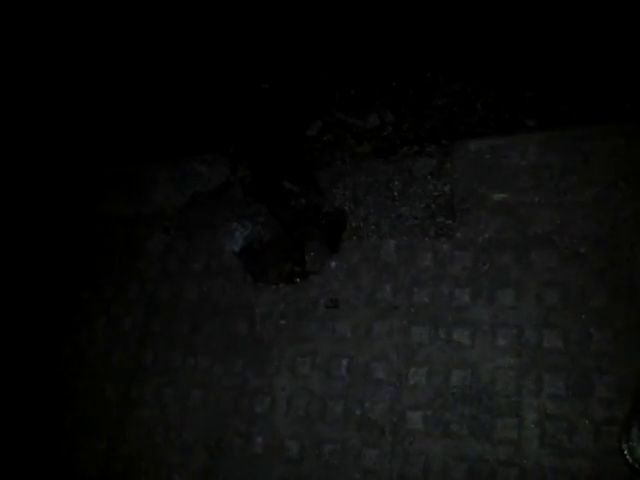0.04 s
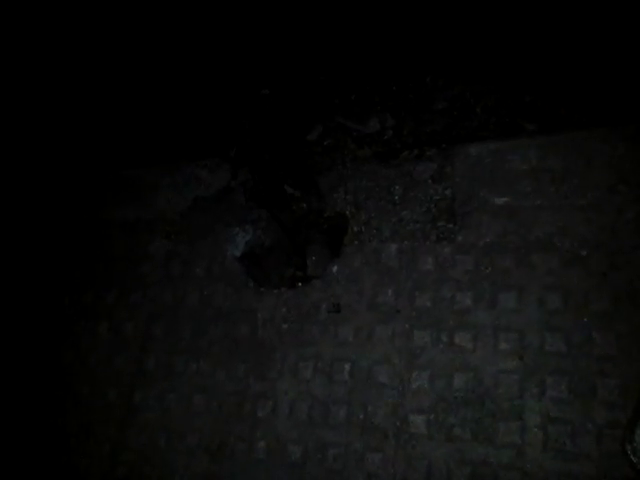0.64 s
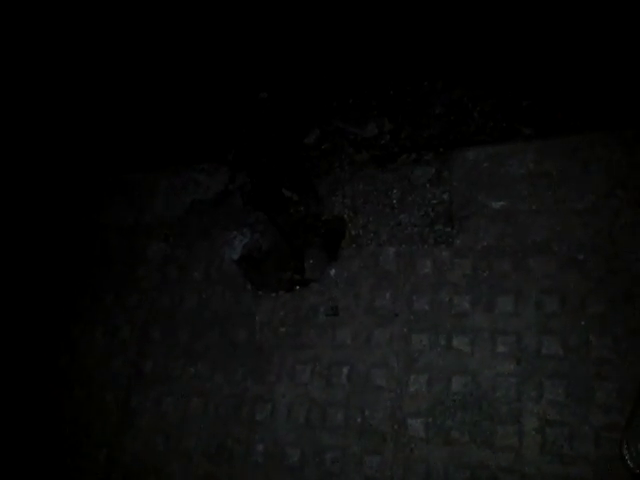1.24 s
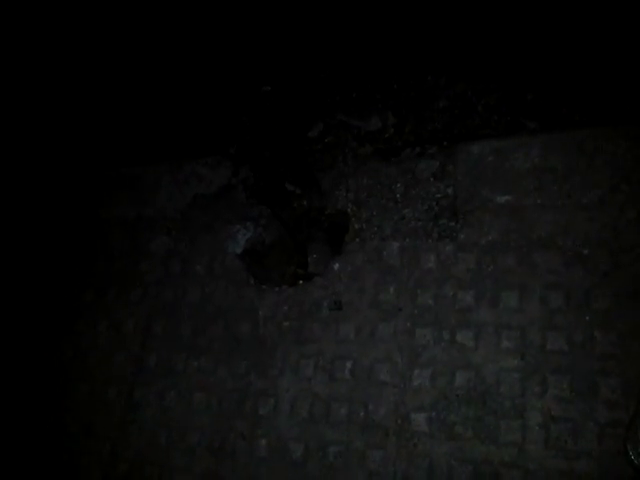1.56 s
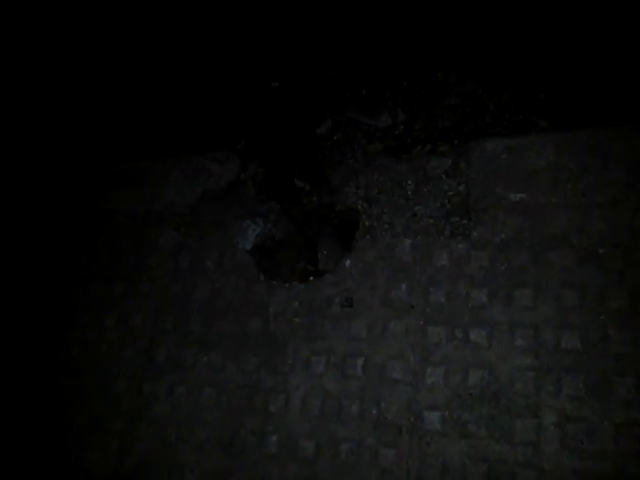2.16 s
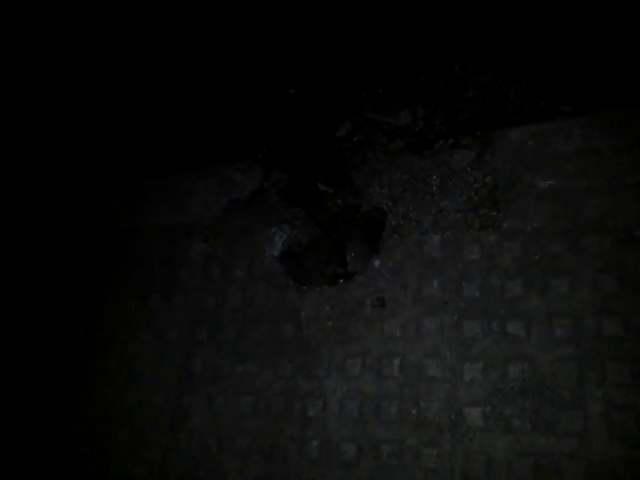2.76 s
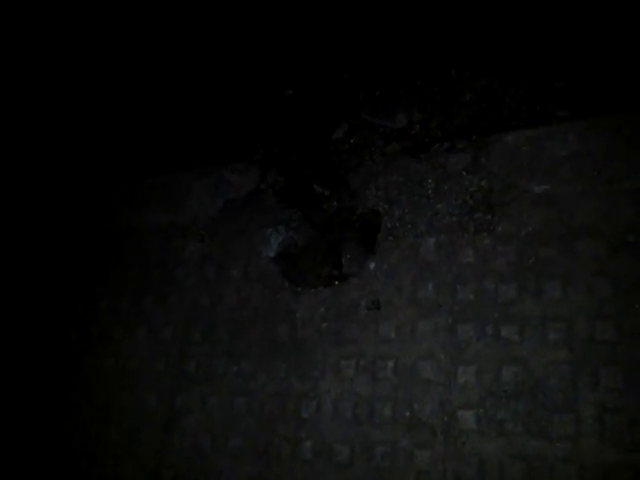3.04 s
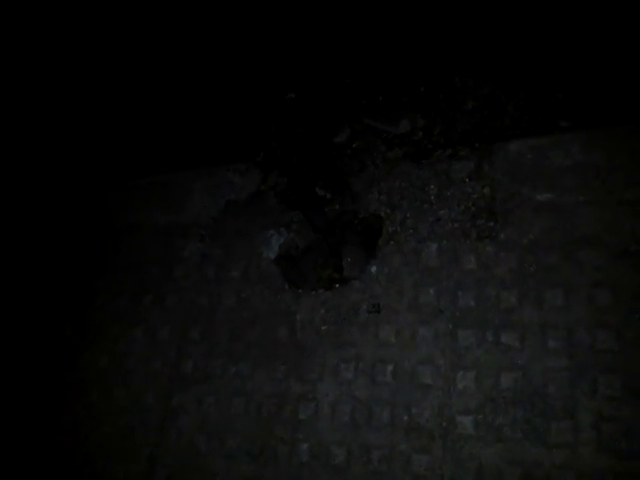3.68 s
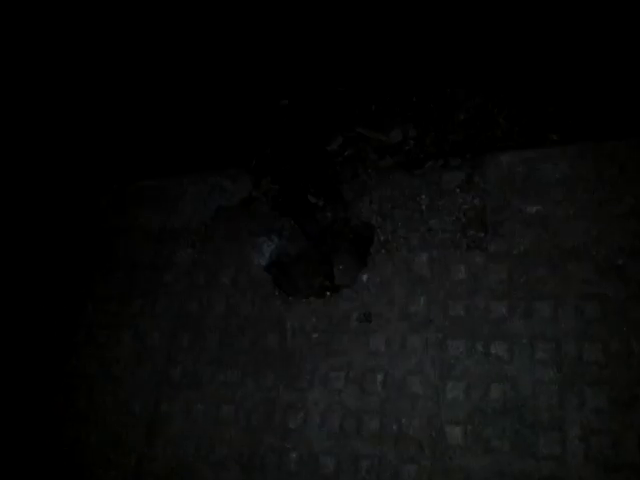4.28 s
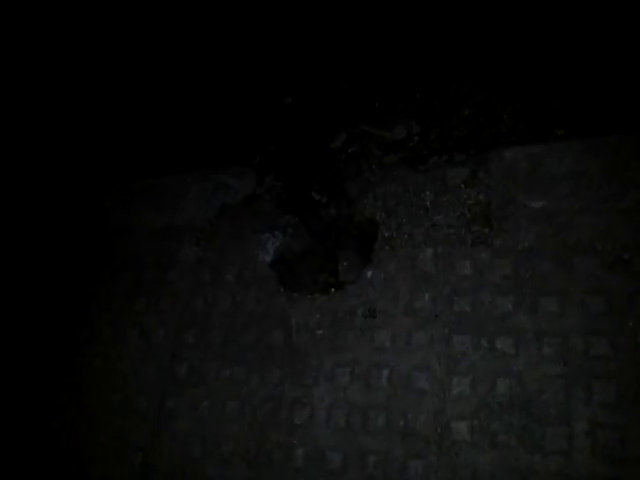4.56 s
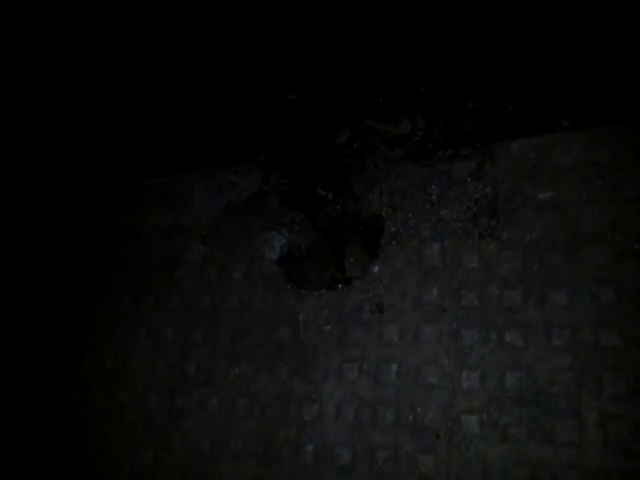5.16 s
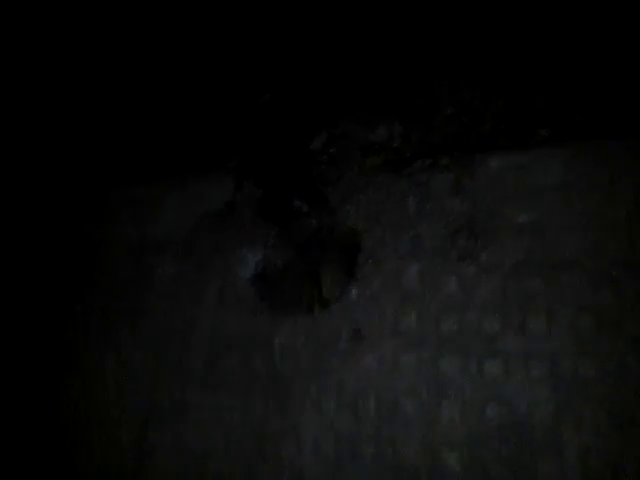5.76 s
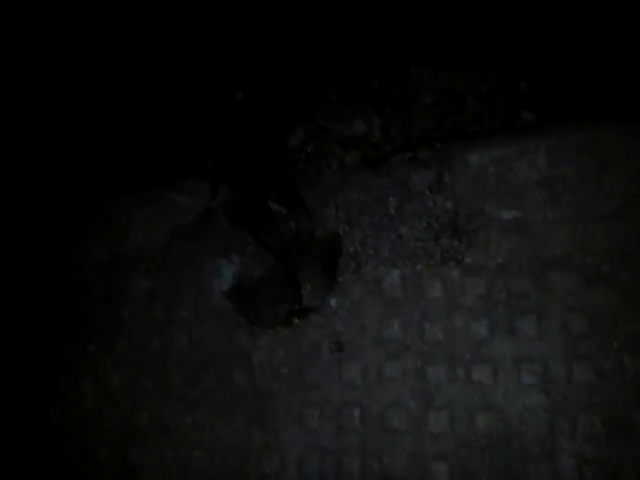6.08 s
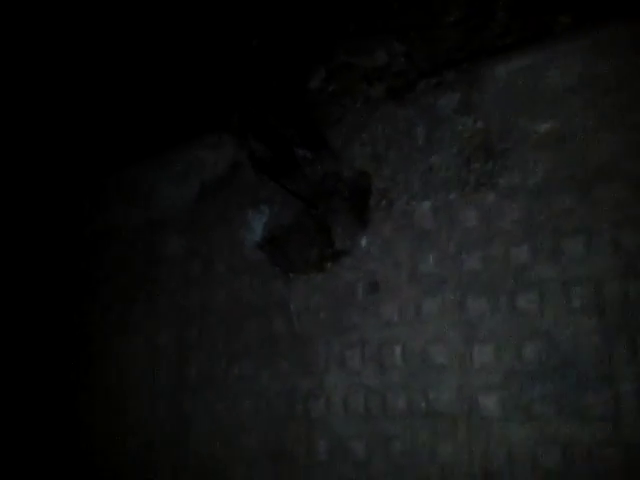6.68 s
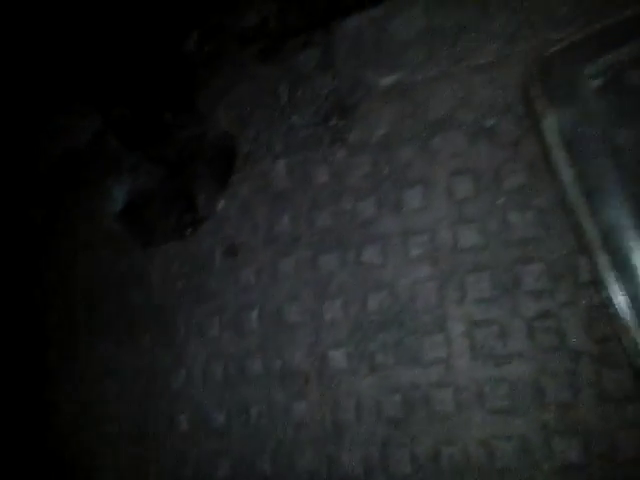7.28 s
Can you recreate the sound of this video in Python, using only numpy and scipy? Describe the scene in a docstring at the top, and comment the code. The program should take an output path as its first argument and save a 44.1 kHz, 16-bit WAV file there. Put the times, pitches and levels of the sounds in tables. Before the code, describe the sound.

Irregular hollow knocks and clacks of a metal tray on stone as a dog eats, with small wet smacks and faint night insects.

```python
"""Paved yard at night: a dog eats from a metal tray. Tongue and teeth tap, lick and scrape the tray; saliva
parts in small smacks. Each knock is a thud and a clack that ring the tray's modes, with brief wall echoes. Once
the tray tips, rocks on the stone and hums. Behind it: a soft dry rustle, a cricket's chirp phrases with a
second cricket's lone chirps, a distant insect's trill and a low wash of night air."""
import sys
import numpy as np
from scipy import signal
from scipy.fft import rfft, irfft
from scipy.io import wavfile
from scipy.ndimage import uniform_filter1d

SR = 44100
rng = np.random.default_rng(int(sys.argv[2]) if len(sys.argv) > 2 else 0)


def wrap_up_sound(samples):
    """Save the sound to the file named by the first command line argument, as 16-bit audio."""
    columns = np.atleast_2d(samples).T
    # keep every value between -1 and 1, then stretch to whole-number steps
    tamed = np.clip(columns, -1, 1)
    steps = np.round(tamed * 32767).astype(np.int16)
    wavfile.write(sys.argv[1], SR, steps)


N = 331632
TIME_S = np.arange(N) / SR

# night air: f/Hz, level/dB
AIR_SPECTRUM = [(25, -38), (50, -8), (70, -21), (95, 0), (130, -10), (200, -4), (265, 1.5), (330, -5.5),
                (520, -5.5), (700, -12.5), (850, -11.5), (1800, -20.5), (4000, -32), (7500, -31),
                (10000, -47), (15500, -41.5)]
# bouts of the distant insect: start/s, end/s, level/dB
TRILL_BOUTS = [(0, .11, -64), (0.296, 0.575, -62), (.7, .82, -65), (1, 1.323, -62), (1.41, 1.55, -69),
               (1.727, 2.018, -63.5), (2.1, 2.2, -64.5), (2.323, 2.63, -62.5), (2.853, 3.17, -63),
               (3.303, 3.416, -71), (3.575, 3.785, -66), (3.984, 4.443, -64), (4.58, 4.822, -64.5),
               (5.04, 5.16, -64), (5.27, 5.553, -65), (6.08, 6.318, -63), (6.622, 6.85, -63),
               (6.946, 7.08, -67), (7.22, 7.456, -63.5)]
# cricket phrases: first chirp t/s, level/dB
CHIRP_PHRASES = [(-.142, -51), (.893, -51), (1.894, -51), (2.799, -53.5), (3.836, -57), (5.03, -56),
                 (6.07, -53.5), (6.885, -54)]
# lone chirps of a second cricket: t/s, level/dB
SINGLE_CHIRPS = [(.295, -59), (.52, -65), (.705, -56.5), (1.34, -61), (1.545, -66), (1.74, -58),
                 (2.32, -63), (3.22, -59), (3.47, -67), (3.69, -63), (4.55, -60.5), (5.925, -58.5)]
# rustle swells: peak t/s, level/dB, rise/s, fall/s
RUSTLE_SWELLS = [(.6, -56.5, .15, 0.23), (1.1, -55, 1, 1), (2.88, -47, 0.29, 0.59),
                 (4.29, -45, 0.048, 0.13), (5.68, -45, 0.21, 0.18), (6.25, -49, 0.14, 0.078),
                 (7.25, -53.5, 0.99, 1)]
# dry rub: f/Hz, level/dB
RUSTLE_SPECTRUM = [(300, 2), (1000, 5.5), (2200, 0.5), (4000, -5.5), (5800, -2), (7400, 3.5), (8400, -3),
                   (9800, -12.5), (13000, -17.5), (15500, -17)]
# gritty scuffs: t/s, length/s, level/dB, tilt/(dB/oct)
GRIT_SCUFFS = [(.408, 0.091, -54.5, 2.5), (0.698, 0.039, -53, 6), (2.75, .22, -51, 0.5),
               (2.947, .011, -45, 8), (2.977, 0.018, -48.5, 7), (3.146, 0.015, -47, 9),
               (3.248, 0.013, -48.5, 8), (4.223, .012, -36.5, -2), (4.231, .035, -42.5, -1.5),
               (4.318, 0.017, -43, -2), (5.215, 0.088, -49, -2.5), (5.668, 0.0079, -29.5, 3),
               (6.05, 0.09, -47, -2.5), (6.095, 0.0039, -44, 4), (6.187, .003, -49, 12),
               (6.528, 0.0034, -39, 0), (6.547, 0.0021, -24, 8), (6.572, 0.0025, -34, -3),
               (6.697, 0.061, -55, 6), (7.082, 0.14, -53.5, 6)]
# scrape hiss: f/Hz, level/dB
SCRAPE_SPECTRUM = [(1180, -43), (2000, -11), (2330, -27), (2720, -8), (3610, -13), (4440, -19), (5400, -7),
                   (6580, -4.5), (7110, -0.5), (12300, -16.5), (14600, -15), (15500, -23)]
# lip and tongue clicks: t/s, level/dB, f/Hz
WET_SMACKS = [(0.327, -35, 746), (.339, -38, 4400), (0.446, -45, 9000), (0.485, -45, 7560),
              (.504, -50, 3520), (.539, -43, 5800), (.594, -40, 6200), (0.722, -35, 6200),
              (.753, -46, 1790), (.776, -46, 7450), (1.091, -46, 7450), (1.185, -43, 5960),
              (1.264, -42.5, 5300), (1.281, -45, 6500), (1.411, -40.5, 1690), (2.613, -30.5, 1500),
              (4.27, -29, 1650), (5.504, -48, 10000), (5.603, -35, 2200), (6.47, -24.5, 1530),
              (6.812, -43, 2450)]
# tongue strokes: t/s, length/s, level/dB, f/Hz
TONGUE_STROKES = [(0.283, 0.068, -47.5, 583), (0.408, 0.13, -40.5, 516), (0.602, 0.037, -50.5, 477),
                  (0.694, 0.054, -44.5, 510), (1.027, 0.09, -42.5, 490), (1.316, 0.057, -40, 425),
                  (1.475, 0.074, -38, 383), (1.85, 0.12, -45, 224), (2.417, 0.16, -45, 333),
                  (4.11, 0.086, -42, 460), (4.214, 0.056, -43, 1630), (4.266, 0.091, -37, 496),
                  (4.387, 0.14, -40.5, 260), (5.24, 0.036, -40.5, 298), (6.23, 0.047, -51, 350),
                  (6.459, 0.0138, -48, 700), (6.731, .018, -40, 600), (6.837, 0.052, -46, 165)]
# tray modes: f/Hz, T60/s, level flat/dB, level tipped/dB
TRAY_MODES = [(224, 0.13, 6.5, -19), (275, 0.2, -11, -0.5), (309, .051, 5, -3.5), (345, 0.084, 1, -2.5),
              (422.8, 0.14, -4, -24), (564, .083, -4.5, -9.5), (656, .061, -7, -5.5),
              (842, 0.059, -5.5, -7), (992, 0.08, 6, -27), (1067, .1, -12, -6), (1256, 0.061, 4.5, -35),
              (1721, 0.08, 1, -12), (1980, .078, 1, -20.5), (2186, 0.047, -8, -12.5), (2366, 0.064, 4, -13),
              (2610, 0.029, -8, -16), (2904, .05, 0, -22), (3244, .06, 8, -25), (3640, .06, -7, -29),
              (3780, 0.054, -6, -33)]
# metal on stone: f/Hz, level/dB
CLACK_SPECTRUM = [(40, -23.5), (160, 2), (250, 12), (600, 9), (1000, 7), (2000, 4), (3300, -3.5),
                  (5000, -7.5), (7500, -8), (10000, -20), (15000, -35)]
# landings of the rocking tray: t/s, level/dB, bottom swing re landing/dB, favoured f/Hz
ROCK_LANDINGS = [(3.0103, -15.5, 3.5, 320), (3.0625, -16, -4, 300), (3.1016, -21, -1.5, 282),
                 (3.1469, -20, -16, 280), (3.183, -31, -10, 290), (3.238, -26, 3, 345),
                 (3.307, -37, 0, 339), (3.374, -36.5, -11, 340.4), (3.451, -35.5, -3, 345),
                 (3.512, -37.5, -1, 345)]
# blows on the tray: t/s, thud level/dB, thud f/Hz, thud rise/cycles, clack level/dB,
# clack tilt/(dB/oct), ring level/dB
TRAY_KNOCKS = [(.058, -19, 630, 0.6, -13, -6, -2), (.323, -29.5, 610, 0.89, -30, -3, -8),
               (.338, -35, 514, 0.49, -11, 0.5, -7), (.415, -28.5, 336, 0.33, -19.5, -14, -7),
               (.445, -28.5, 557, 0.97, -31, -6, -5), (.486, -20.5, 554, 0.5, -13, 0, -11),
               (.726, -31, 493, 0.54, -25, -1, -13), (.971, -28, 520, 0.52, -18.5, -7, -8),
               (1.061, -29, 433, 0.68, -22, 0, -6), (1.345, -24.5, 435, 0.49, -8.5, -2.5, 1.5),
               (1.365, -27, 418, .57, -14.5, -5, -2), (1.518, -26.5, 437, 0.78, -32, -2, 3),
               (1.797, -43, 290, .57, -10, -2.5, -5), (2.0128, -19, 360, 0.86, -7, -3.5, -5.5),
               (2.432, -33.5, 273, .57, -16, -9, 2.5), (2.46, -29, 400, 0.32, -10.5, 3.5, -1),
               (2.613, -23.5, 463, .57, -6.5, -3, -7), (2.663, -13.5, 345, 0.74, -5, -2, -8),
               (2.6695, -11.5, 385, 0.5, 11, 0, -0.5), (2.6821, -39, 400, .57, -1.5, 1.5, -1),
               (2.6858, -27, 500, .57, -0.5, .5, -5), (2.8105, -11, 305, 0.48, -3.5, -8.5, -2.5),
               (4.041, -31.5, 237, .4, -8, -8, -3.5), (4.158, -47, 460, .57, -12, -4.5, 0),
               (4.271, -23, 356, 0.45, -6, -6, -9.5), (4.285, -29, 470, .75, -14, -4, -6),
               (4.32, -30, 417, .57, -8.5, -3, -3), (4.3631, -16.5, 301, 0.57, -4.5, -7.5, -10),
               (4.376, -32, 300, .57, -9.5, -9, -8), (4.442, -22.5, 312, 0.82, -26, -9, -21),
               (4.492, -36, 280, .4, -20, -6, -4), (4.8058, -19, 588, 0.46, 7.5, 1.5, -4.5),
               (4.8838, -20, 419, 0.44, -15, -2.5, -6), (4.9779, -16, 435, .57, 4, -12, -5),
               (4.982, -3, 307, 0.61, 5.5, 1, -4), (5.275, -31, 260, 0.68, -12, -8.5, -4),
               (5.9819, -21, 332, 0.55, -7, -7, 0), (5.9862, -14, 315.6, 0.38, 2, -4, -10),
               (6.0252, -19, 400, 0.7, 11.5, 3, 5.5), (6.0278, -17, 253, 0.35, 12, 2, 1.5),
               (6.291, -35, 316, .57, -16.5, -2, -3), (6.4706, -23.5, 250, 0.24, -10.5, -7.5, -2.5),
               (6.5295, -27, 354, 0.74, -17, -1, -6), (6.548, -3.5, 363, 0.8, 9.5, -0.5, -3.5),
               (6.7441, -23, 463, .45, -5.5, -8, -7), (6.749, -13.5, 284, 0.38, -11.5, -4.5, -4.5),
               (6.859, -39, 282, 0.42, -28, -8, -4)]
# ground and wall reflections: delay/s, gain
YARD_ECHOES = [(.0037, 0.76), (0.0114, 0.34), (.017, 0.25)]
# yard reverberation: f/Hz, T60/s
YARD_DECAY = [(150, 0.48), (400, 0.25), (1000, 0.15), (3000, 0.19), (8000, 0.13), (15000, 0.15)]


def amp(db):
    """dB to gain."""
    return 10 ** (np.asarray(db) / 20)


def unit(x):
    """Scale to rms 1."""
    return x / np.sqrt(np.mean(x ** 2) + 1e-20)


def lookup(points, hz):
    """Interpolate over log frequency."""
    f, value = np.transpose(points)
    return np.interp(np.log(hz + 1), np.log(f), value)


def add(mix, at_s, sound):
    """Mix in at a time."""
    part = mix[max(round(at_s * SR), 0):][:len(sound)]
    part += sound[:len(part)]


def colour(x, gain):
    """Filter by gain(f/Hz)."""
    return irfft(rfft(x) * gain(np.fft.rfftfreq(len(x), 1 / SR)), len(x))


def shaped(x, spectrum):
    """Filter by a spectrum table, rms 1."""
    return unit(colour(x, lambda f: amp(lookup(spectrum, f))))


def band(x, hz, width_hz):
    """Steep band-pass, rms 1."""
    return unit(colour(x, lambda f: 1 / (1 + ((f - hz) / width_hz) ** 2) ** 2))


def drift(rate_hz):
    """Slow random motion, rms 1."""
    return band(rng.standard_normal(N), 0, rate_hz)


def click(spectrum_db):
    """Minimum-phase impulse of a spectrum."""
    cepstrum = irfft(np.log(amp(spectrum_db)))
    half = len(cepstrum) // 2
    cepstrum[1:half] *= 2
    cepstrum[half + 1:] = 0
    return irfft(np.exp(rfft(cepstrum)))[:half]


def grains(size, per_s, spread_db):
    """Sparse, uneven clicks, rms 1."""
    chance, sign, height = rng.random(size), rng.choice([-1, 1], size), rng.exponential(1, size)
    return unit((chance < per_s / SR) * sign * amp(spread_db * np.minimum(height, 4)))


def burst(t, peak_s):
    """Noise that swells and decays, energy 1."""
    x = rng.standard_normal(len(t)) * t * np.exp(-t / peak_s)
    return x / np.linalg.norm(x)


def yard_tail(t, rise_s=.00018):
    """Diffuse reflections, energy 1; bass lasts longest."""
    hz, frame_s, bins = signal.stft(rng.standard_normal(len(t)), SR, nperseg=256)
    decay = amp(-60 * frame_s / lookup(YARD_DECAY, hz)[:, None])
    tail = signal.istft(bins * decay, SR, nperseg=256)[1][:len(t)]
    tail *= 1 - np.exp(-t / rise_s)
    return tail / np.linalg.norm(tail)


def in_yard(x, wet_db):
    """Sound plus its reverberation."""
    return x + amp(wet_db) * signal.fftconvolve(x, yard_tail(np.arange(SR // 3) / SR))[:N]


def night_air(level_db=-48.5, waver_db=2):
    """Low wash of distant noise."""
    wash = shaped(rng.standard_normal(N), AIR_SPECTRUM)
    return amp(level_db + waver_db * drift(rate_hz=13.8)) * wash


def trill(hz=4577, width_hz=410, pulse_hz=46, throb_db=1.8, lull_db=-71.5, fade_s=.078):
    """Distant insect: a pulsing noise band, in bouts."""
    bouts_db = [np.where((TIME_S > start) & (TIME_S < end), db, lull_db)
                for start, end, db in TRILL_BOUTS]
    level_db = uniform_filter1d(np.max(bouts_db, 0), round(fade_s * SR))
    throb = drift(rate_hz=17) + np.sin(2 * np.pi * pulse_hz * TIME_S)
    return amp(level_db + throb_db * throb) * band(rng.standard_normal(N), hz, width_hz)


def chirp_times(per_phrase=4, gap_s=.058, base_hz=5134, step_hz=24, first_hz=5140, first_db=-5.5):
    """Rows of t/s, level/dB, f/Hz; a phrase starts weak and climbs in pitch."""
    firsts = [(s, db + first_db, first_hz) for s, db in CHIRP_PHRASES]
    rest = [(s + k * gap_s, db, base_hz + k * step_hz)
            for s, db in CHIRP_PHRASES for k in range(1, per_phrase)]
    singles = [(s, db, first_hz) for s, db in SINGLE_CHIRPS]
    return [chirp for chirp in firsts + rest + singles if chirp[0] > 0]


def cricket(chirp_s=.044, gain_db=-2, width_hz=190, glide_hz=70, rasp_hz=140, echo_db=-4, echo_s=.07):
    """Wings rasp in rising chirps, blurred by far echoes."""
    t, out = np.arange(SR // 4) / SR, np.zeros(N)
    u = t[t < chirp_s]
    swell = np.sin(np.pi * u / chirp_s) * (1 + .4 * np.cos(2 * np.pi * rasp_hz * u))
    glide = np.exp(2j * np.pi * np.cumsum(glide_hz * (u / chirp_s - .5)) / SR)
    for at_s, db, hz in chirp_times():
        wing = signal.hilbert(band(rng.standard_normal(len(t)), hz, width_hz))[:len(u)]
        add(out, at_s - chirp_s / 2, amp(gain_db + db) * swell * unit((wing * glide).real))
    tail = rng.standard_normal(len(t)) * np.exp(-t / echo_s)
    return out + amp(echo_db) * signal.fftconvolve(out, tail / np.linalg.norm(tail))[:N]


def rustle_db(t, floor_db=-69.5):
    """Rustle envelope: exponential swells over a faint stir."""
    swells = [amp(db) * np.exp(-np.maximum((peak_s - t) / rise_s, (t - peak_s) / fall_s))
              for peak_s, db, rise_s, fall_s in RUSTLE_SWELLS]
    return 10 * np.log10(amp(floor_db) ** 2 + np.square(swells).sum(0))


def rustle(gain_db=-3.5, crackle_db=-5, flutter_db=2):
    """Uneven dry rub with tiny crackles."""
    level_db = gain_db + rustle_db(TIME_S) + flutter_db * drift(rate_hz=46)
    rub = rng.standard_normal(N) + amp(crackle_db) * grains(N, per_s=2300, spread_db=4)
    return amp(level_db) * shaped(rub, RUSTLE_SPECTRUM)


def scuffs(gain_db=-3, low_hz=250, top_hz=14500, catch_s=.0077, catch_db=2, catch_db_oct=-5.5):
    """The rub catches on grit; faint random catches follow the rustle level."""
    out = np.zeros(N)
    catches = [(s, catch_s, rustle_db(s) + catch_db, catch_db_oct) for s in rng.random(16) * N / SR]
    for at_s, length_s, db, db_oct in GRIT_SCUFFS + catches:
        grit = grains(SR // 4, per_s=3900, spread_db=7)
        grit = colour(grit, lambda f: amp(lookup(RUSTLE_SPECTRUM, f) + db_oct * np.log2(f + 1)))
        grit = colour(grit, lambda f: f ** 2 / (f ** 2 + low_hz ** 2) / np.hypot(1, (f / top_hz) ** 4))
        swell = signal.windows.cosine(min(round(length_s * SR), len(grit)))
        add(out, at_s, amp(gain_db + db) * unit(swell * grit[:len(swell)]))
    return in_yard(out, wet_db=-7)


def scrape(at_s=5.668, length_s=.21, level_db=-44.5, sag_db=7, attack_s=.008, release_s=.055,
           low_hz=1800, top_hz=12500):
    """One gritty hiss: fast onset, late sag."""
    t, out = np.arange(0, length_s, 1 / SR), np.zeros(N)
    grit = rng.standard_normal(SR // 2) + amp(-6) * grains(SR // 2, per_s=2500, spread_db=3)
    grit = colour(grit, lambda f: f ** 2 / (f ** 2 + low_hz ** 2) / np.hypot(1, (f / top_hz) ** 2))
    hiss = shaped(grit, SCRAPE_SPECTRUM)[:len(t)]
    gate = np.minimum(np.minimum(t / attack_s, (length_s - t) / release_s), 1)
    add(out, at_s, amp(level_db - sag_db * (t / length_s) ** 3) * gate * hiss)
    return out


def smacks(rise_s=.001):
    """A saliva film stretches and parts."""
    t, out = np.arange(SR // 20) / SR, np.zeros(N)
    for at_s, db, hz in WET_SMACKS:
        snap = band(rng.standard_normal(len(t)), hz, width_hz=.42 * hz) * t * np.exp(-t / rise_s)
        add(out, at_s, amp(db) * snap / np.abs(snap).max())
    return in_yard(out, wet_db=-7)


def licks(grit_db=-20):
    """The tongue sticks and slips on the tray, dragging grit."""
    out = np.zeros(N)
    for at_s, length_s, db, hz in TONGUE_STROKES:
        slips = grains(SR // 4, per_s=420, spread_db=3)
        rub = band(slips, hz, width_hz=.59 * hz) + amp(grit_db) * shaped(slips, CLACK_SPECTRUM)
        stroke = signal.windows.tukey(min(round(length_s * SR), len(slips)), .5)
        add(out, at_s, amp(db) * stroke * rub[:len(stroke)])
    return in_yard(out, wet_db=-8)


def nudges(thud_db=-6, thud_hz=360, rise_cycles=.6, clack_db=22.5, db_oct=-10.5, ring_db=-2.5):
    """Knock rows: one soft push of the tongue at a random point of each stroke."""
    draws = rng.random((len(TONGUE_STROKES), 2))
    return [(at_s + when * length_s, db + thud_db, thud_hz * 2 ** (.5 * (spot - .5)), rise_cycles,
             db + clack_db, db_oct, ring_db)
            for (at_s, length_s, db, _), (when, spot) in zip(TONGUE_STROKES, draws)]


def bottom_hum(t, attack, hz, gain_db=-3.5, t60_s=.33, waver_hz=2.5,
               settle_at_s=3.16, settle_s=.034, settled_db=-8.5):
    """Landings swing the free bottom; it rings more faintly once the tray lies down."""
    swing = np.zeros(N)
    for at_s, db, bottom_db, _ in ROCK_LANDINGS:
        add(swing, at_s, amp(db + bottom_db + gain_db - 60 * t / t60_s) * attack)
    cycles = np.cumsum(hz + waver_hz * drift(rate_hz=25)) / SR  # shifting load bends the pitch
    settled = np.clip((TIME_S - settle_at_s) / settle_s, 0, 1)
    return swing * amp(settled_db * settled) * np.sin(2 * np.pi * cycles)


def rocking(bottom_hz=186, rise_s=.0011, muzzle_t60_s=.15, spot_db=2.5, favour_db=6, favour_oct=.26,
            push_db=-8, push_hz=135, push_s=.0031, tick_db=8, tick_s=.0026, tick_top_hz=3400,
            crack_db=-4, leak_hz=112):
    """The tipped tray lands on its rim in hollow knocks, damped by the muzzle."""
    t, out = np.arange(SR // 2) / SR, np.zeros(N)
    hz, t60_s, _, tipped_db = np.transpose(TRAY_MODES)[:, :, None]
    signs = np.where(np.arange(len(hz)) % 2, -1, 1)[:, None]
    decays = signs * amp(tipped_db - 60 * t * (1 / t60_s + 1 / muzzle_t60_s))
    octaves = np.log2(hz / bottom_hz)
    attack = 1 - np.exp(-t / rise_s)
    weight_push = amp(push_db) * t / push_s * np.exp(1 - t / push_s) * np.sin(2 * np.pi * push_hz * t)
    for at_s, db, _, favoured_hz in ROCK_LANDINGS:
        db_oct = .45 * (db - ROCK_LANDINGS[0][1])  # weaker landings are duller
        # each spot on the rim favours other modes
        mode_db = spot_db * rng.standard_normal(hz.shape) * np.minimum(octaves, 1)
        mode_db += favour_db * np.exp(-(np.log2(hz / favoured_hz) / favour_oct) ** 2)
        detuned_hz = hz * (1 + .025 * rng.standard_normal(hz.shape) * octaves / octaves.max())
        modes = amp(db_oct * octaves + mode_db) * decays * np.cos(2 * np.pi * detuned_hz * t)
        tick = burst(t, tick_s) + amp(crack_db) * burst(t, tick_s / 10)
        tick = colour(tick, lambda f: amp(lookup(CLACK_SPECTRUM, f)) / np.hypot(1, f / tick_top_hz))
        tick *= amp(tick_db) / np.linalg.norm(tick)
        add(out, at_s, amp(db) * (modes.sum(0) * attack + weight_push + tick))
    leak = signal.butter(2, leak_hz, "high", fs=SR, output="sos")  # bass slips round the rim
    return bottom_hum(t, attack, bottom_hz) + in_yard(signal.sosfilt(leak, out), wet_db=-13)


def early_paths(t, top_hz=2200):
    """Direct impulse plus echoes; rough paving mirrors only the lows."""
    echoes = np.zeros(len(t))
    for delay_s, gain in YARD_ECHOES:
        add(echoes, delay_s, np.array([gain]))
    return (t == 0) + signal.sosfilt(signal.butter(2, top_hz, fs=SR, output="sos"), echoes)


def knocks(firm_db=6, early_db=-5.5, chatter_db=-4, chatter_s=.00062, scatter_db=-10, scatter_s=.004,
           spot_db=2, thud_ring_db=-49, clack_ring_db=-48.5, thud_yard_db=-17, clack_yard_db=-9):
    """Each blow flexes the tray (thud) and strikes it on stone (clack); both ring its modes."""
    t, out = np.arange(SR // 3) / SR, np.zeros(N)
    modes = np.array([-amp(db - 60 * t / t60_s) * np.sin(2 * np.pi * hz * t)
                      for hz, t60_s, db, _ in TRAY_MODES])
    early = early_paths(t)
    bins_hz = np.fft.rfftfreq(2048, 1 / SR)
    octaves = np.log2(np.clip(bins_hz, 700, 7000) / 1500)
    for at_s, thud_db, thud_hz, rise_cycles, clack_db, db_oct, ring_db in TRAY_KNOCKS + nudges():
        flex = t * thud_hz / rise_cycles
        thud = amp(thud_db) * flex * np.exp(1 - flex) * -np.sin(2 * np.pi * thud_hz * t)
        clack = amp(clack_db) * click(lookup(CLACK_SPECTRUM, bins_hz) + db_oct * octaves)
        # hard blows land at once; light ones are cushioned and spread over several points
        soft_db = max(firm_db - clack_db, 0)
        chatter = amp(chatter_db) * burst(t, chatter_s * 2 ** (soft_db / 12))
        scatter = amp(scatter_db) * burst(t, scatter_s)
        contact = amp(early_db - .87 * soft_db) * early + chatter + scatter
        tail = yard_tail(t)
        ring = amp(ring_db + spot_db * rng.standard_normal(len(modes))) @ modes
        thud_response = early + amp(thud_ring_db) * ring + amp(thud_yard_db) * tail
        clack_response = contact + amp(clack_ring_db) * ring + amp(clack_yard_db) * tail
        add(out, at_s, signal.fftconvolve(thud, thud_response))
        add(out, at_s, signal.fftconvolve(clack, clack_response))
    return out


def scene():
    """Dog and tray over the night yard, mono."""
    eating = knocks() + rocking() + licks() + smacks()
    friction = rustle() + scuffs() + scrape()
    return (eating + friction + cricket() + trill() + night_air())[None]


def record(dry, bass_hz=60, ceiling=.95, top_hz=16100):
    """Small microphone: bass cut, soft peak limit, band limit."""
    thin = signal.sosfilt(signal.butter(2, bass_hz, "high", fs=SR, output="sos"), dry)
    limited = thin / (1 + np.abs(thin / ceiling) ** 6) ** (1 / 6)
    lowpass = signal.firwin(255, top_hz, window=("kaiser", 9), fs=SR)
    return signal.oaconvolve(limited, lowpass[None], "same")


dry = scene()
out = record(dry)
wrap_up_sound(out)
```